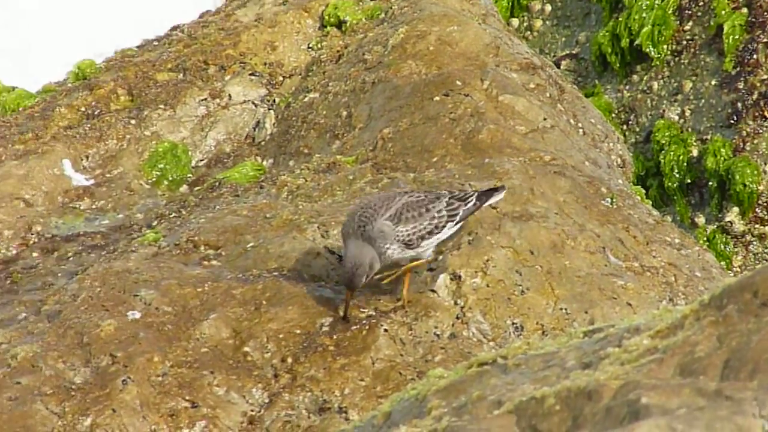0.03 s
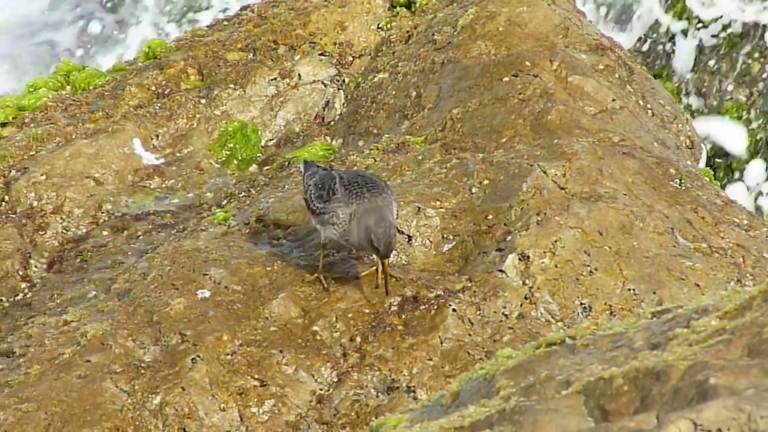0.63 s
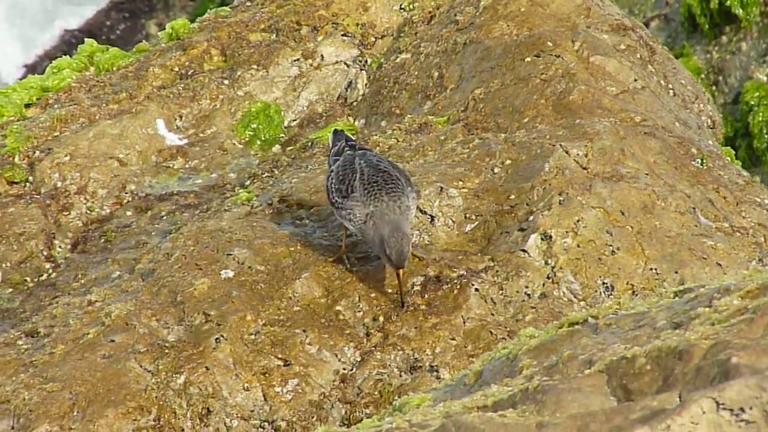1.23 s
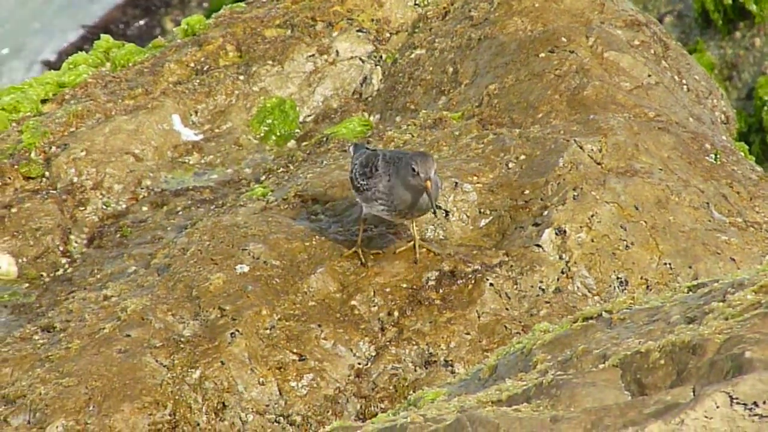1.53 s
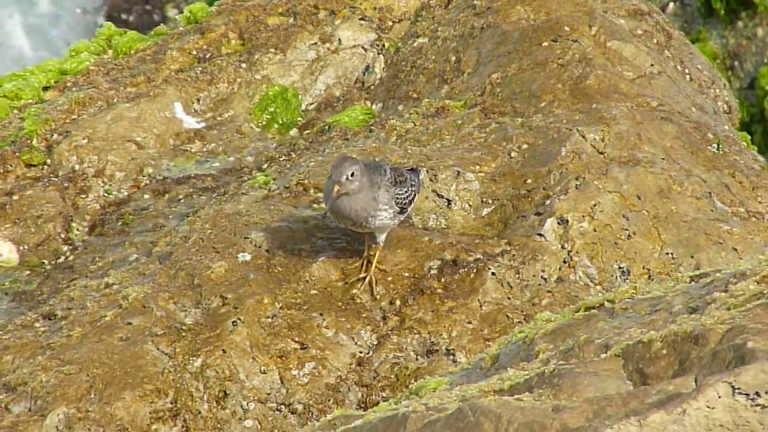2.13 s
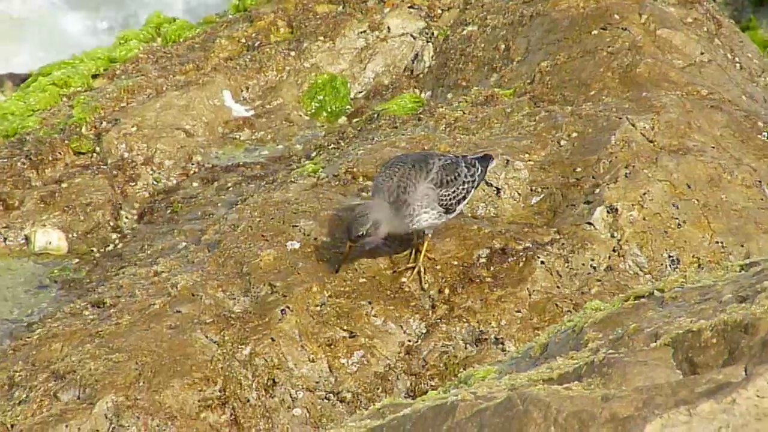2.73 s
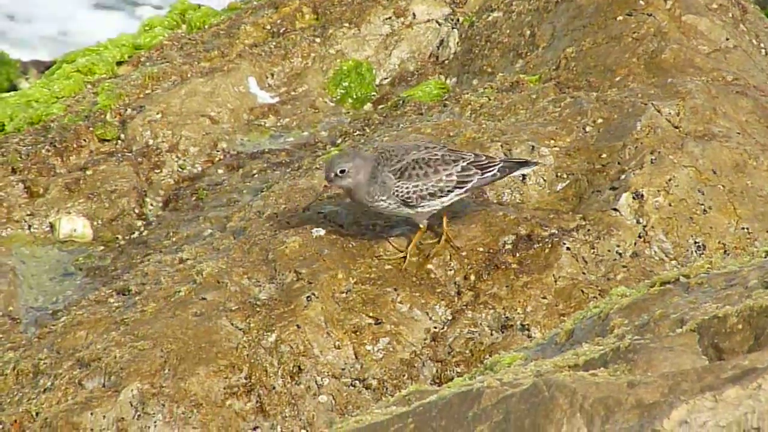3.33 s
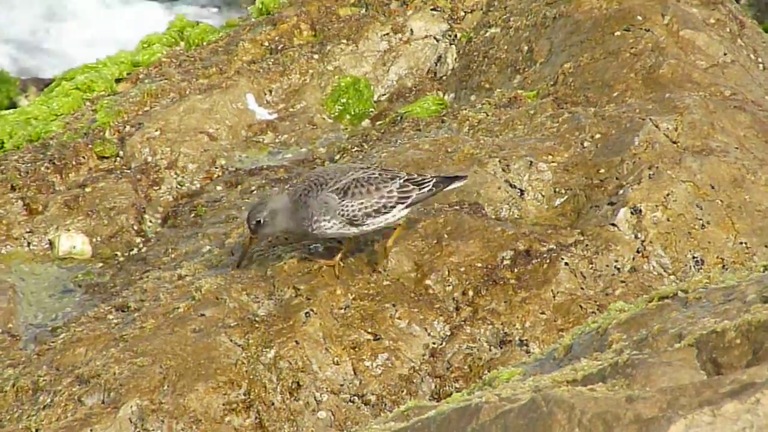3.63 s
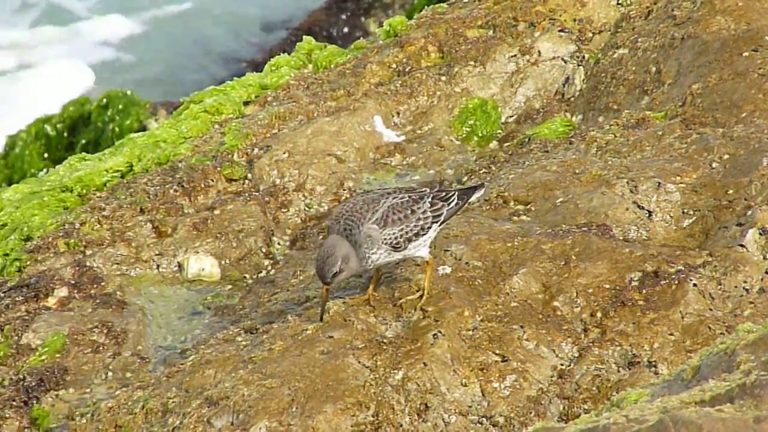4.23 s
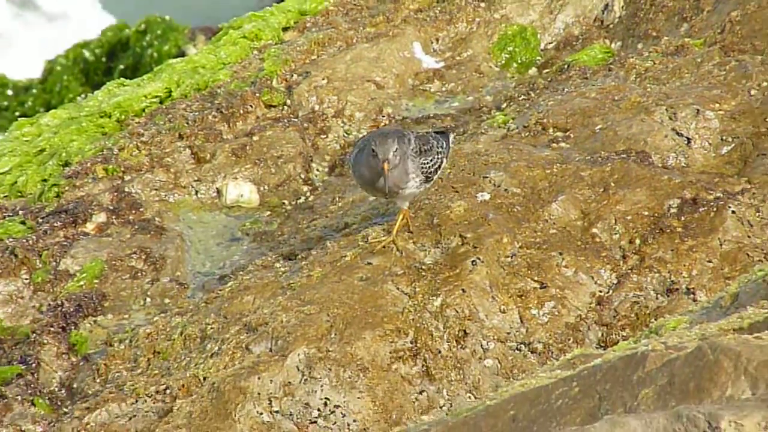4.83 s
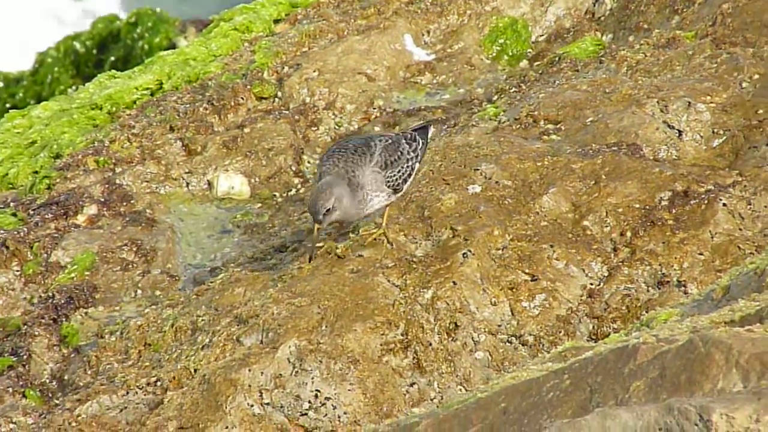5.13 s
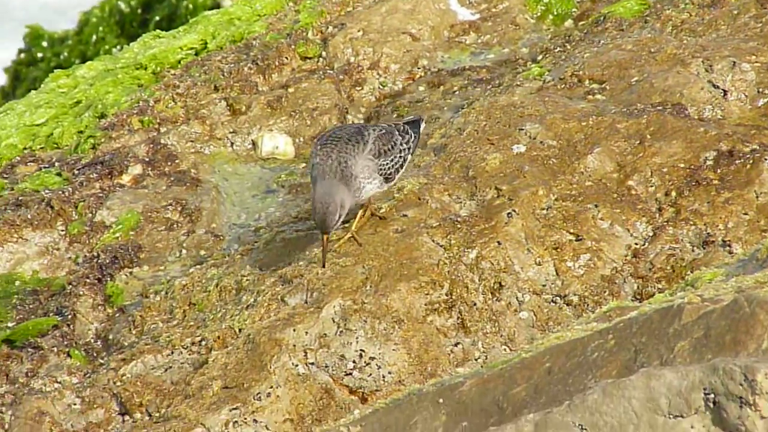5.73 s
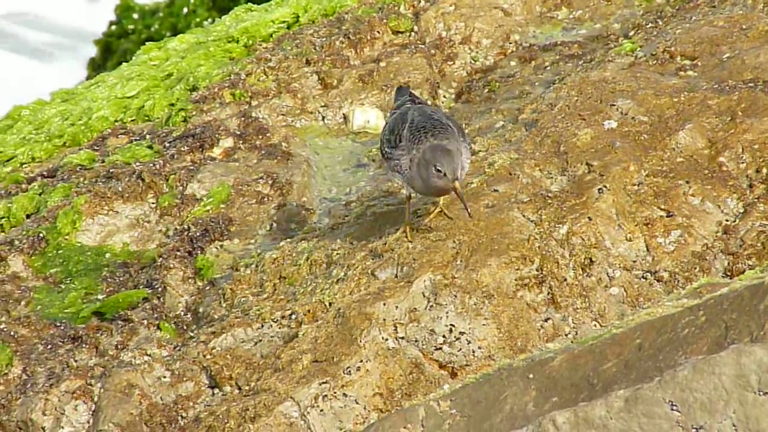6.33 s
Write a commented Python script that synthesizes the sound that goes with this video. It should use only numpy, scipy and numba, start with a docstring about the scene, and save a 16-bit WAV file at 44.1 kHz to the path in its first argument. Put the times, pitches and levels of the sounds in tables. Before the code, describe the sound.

Surf roars and churns steadily in a rocky inlet a few metres below the microphone, with soft hollow booms and a fine fizz of foam. White water washes over the rocks at first and thins after about two seconds. A breeze rises and buffets the microphone with low rumbles and thumps, heavier on the left, then eases in the last couple of seconds while the sea carries on.

```python
"""Surf roars and churns in a rocky inlet, a few metres below a camera with two microphone ports.
Trapped air throbs, swells boom in hollows, and tiny bursting bubbles make foam fizz all round.
A sheet of white water runs over the rocks and thins out after two seconds.
A breeze rises and its eddies buffet the ports, the left one most.
The camera whines faintly, limits the peaks and notches the treble."""
import sys
import numpy as np
from scipy import signal
from scipy.fft import rfft, irfft, next_fast_len
from scipy.io import wavfile
from scipy.ndimage import uniform_filter1d
from numba import njit

SR = 44100
rng = np.random.default_rng(int(sys.argv[2]) if len(sys.argv) > 2 else 0)


def transcribe(signal):
    """Save signal, clipped to [-1, 1], as a 16-bit WAV file at the path in sys.argv[1]."""
    frames = np.atleast_2d(signal).T
    limited = np.clip(frames, -1, 1)
    pcm = np.round(limited * 32767).astype(np.int16)
    wavfile.write(sys.argv[1], SR, pcm)


N = 290178

# the breeze between gusts: time_s, level_db
BREEZE = [(0, -53), (.7, -37), (1.3, -33), (1.7, -24), (2.0, -26.5), (2.6, -23.5), (3.1, -28.5), (3.6, -22),
          (4.42, -40), (4.7, -29.5), (5.4, -32.5), (6.15, -28.5), (6.58, -30.5)]
# gusts riding on the breeze: crest_s, level_db, build_s
GUSTS = [(.92, -29, 0.038), (1.13, -26.5, 0.11), (1.6, -26, 0.11), (1.72, -19, 0.04), (1.87, -21.5, 0.099),
         (2.18, -21, 0.072), (2.35, -17, 0.066), (2.74, -20.5, 0.091), (2.88, -22, 0.063),
         (2.99, -23, 0.047), (3.31, -23, 0.11), (3.58, -19.5, 0.065), (3.72, -24, 0.14),
         (3.91, -23.5, 0.06), (4.14, -22.5, 0.05), (4.34, -22, 0.12), (4.49, -25.5, 0.039),
         (6.22, -27.5, 0.1)]
# single eddies that thump the ports, each with its own loudness and pitch: centre_s, level_db, pitch_hz
BUFFETS = [(1.448, -14, 200), (1.514, -8, 220), (1.589, -15, 150), (1.674, -8, 230), (1.686, -4.5, 220),
           (1.698, -9, 135), (1.74, -11, 150), (1.802, -16, 121), (1.816, -14, 95), (2.127, -12, 213),
           (2.148, -14, 150), (2.181, -4.5, 140), (2.284, -9, 149), (2.310, -6.5, 117), (2.346, -9, 75),
           (2.368, -3, 125), (2.666, -12.5, 170), (2.686, -5, 150), (2.727, -8, 130), (2.816, -16, 130),
           (2.88, -17, 135), (3.177, -12.5, 150), (3.272, -9, 114), (3.392, -7, 220), (3.511, -11, 119),
           (3.544, -10.5, 110), (3.56, -13, 130), (3.594, -11, 160), (3.628, -6.5, 191), (3.66, -8, 110),
           (3.708, -9, 111), (3.851, -9, 100), (3.896, -11, 130), (4.087, -13, 100), (4.161, -14, 170),
           (4.199, -10, 150), (4.319, -14, 190), (4.348, -15, 150), (6.217, -11, 160)]
# tone of the wind's large and small eddies: frequency_hz, gain_db
RUMBLE_EQ = [(20, -13), (45, -3.5), (72, 3), (120, 3), (190, 0.1), (280, -7.5), (380, -13.5), (550, -20.5),
             (900, -24.5), (2000, -62.5)]
FLUTTER_EQ = [(80, -17), (160, -3.5), (230, 0.5), (320, -5), (450, -8.5), (700, -17.5), (1500, -53.5)]
# how alike the two ports sound: frequency_hz, correlation (clipped at -1 and 1)
WIND_LIKENESS = [(30, 1), (80, 0.82), (130, 0.64), (190, 0.23), (300, 0.13), (1000, -1.2)]
FOAM_LIKENESS = [(700, .3), (1500, 0), (2500, 0.034), (3200, 0.46), (3800, 0.64), (5000, .42), (6000, .3),
                 (6600, -0.19), (8000, -0.37)]

# the surge and ebb of the sea: time_s, roar_db, white_water_db
SURGE = [(0, -26, -30.5), (.6, -27, -31), (1.03, -27, -33.5), (1.5, -26, -31.5), (2.08, -27, -36),
         (2.4, -28, -38), (2.9, -28, -37.5), (3.3, -26, -37), (3.55, -27.5, -39.5), (3.8, -26.5, -39.5),
         (4.2, -27.5, -39), (4.9, -28.5, -39), (6.58, -28.5, -39)]
# spray thrown up by the rocks: centre_s, foam_boost_db
SPLASHES = [(.63, 0.5), (1.36, 1), (2.05, 1.0), (2.9, 1.0), (3.98, 1.0), (6.13, 0.9)]
# water slumping into hollows of the rock: centre_s, level_db, pitch_hz
SLUMPS = [(0.523, -25.5, 377), (0.895, -26.5, 240), (0.985, -24, 323), (1.145, -21.5, 310),
          (1.26, -24.5, 268), (1.46, -24.5, 414), (1.89, -26.5, 295), (1.975, -24.5, 338),
          (2.143, -22, 342), (2.61, -26, 274), (2.69, -20.5, 340), (2.84, -23, 340), (3.17, -21.5, 323),
          (3.275, -20.5, 400), (3.40, -19.5, 253), (3.87, -28, 362), (4.14, -22.5, 247), (4.33, -21.5, 248),
          (4.45, -24, 276), (4.87, -25.5, 310), (5.34, -24, 330), (5.61, -25.5, 310), (5.69, -27, 282),
          (5.86, -25, 345), (6.17, -25, 340)]
# tone of each water layer: frequency_hz, gain_db
FOAM_EQ = [(100, 4), (700, -5), (1200, 4.5), (1800, 5.5), (2400, 4), (3300, 6), (4200, 1.5), (5000, 2),
           (6000, 1), (7200, -1), (8000, -11.5), (8300, -23)]
WHITE_WATER_EQ = [(400, -0.5), (800, -5.5), (1200, 7), (1600, 5), (2000, 3), (2600, -11), (3300, -3),
                  (4500, -15.5), (8000, -28.5)]
CHURN_EQ = [(20, -29), (60, -13), (115, -5), (170, -5.5), (230, -0.5), (320, 1.5), (420, 0), (530, -6.5),
            (700, -21.5), (1200, -65)]
ROAR_EQ = [(300, -16.5), (550, -2.5), (660, -4.5), (780, -2.5), (1020, -0.5), (1250, -5.5), (1550, -12.5),
           (2200, -42), (4000, -63)]

# the camera body colours the sea differently at each port: frequency_hz, left_minus_right_db
PORT_BALANCE = [(1000, 0), (1550, -1), (1950, 2), (2200, -1.5), (3000, 1.5), (4000, 2.5), (4500, 1),
                (5000, 1), (5500, -2.5), (7000, -1), (8000, 0)]
# it also shifts the phase between them: frequency_hz, left_lead_rad
PORT_PHASE = [(1000, 0.11), (1700, 0.48), (2300, 0.79), (3200, -0.087), (3800, -1.8), (4900, -0.8),
              (6000, -.8), (7500, -0.15)]
# the camera's treble notches: centre_hz, width_hz
NOTCHES = [(2600, 540), (4608, 950), (5432, 270), (7908, 180), (8096, 170)]

TIME_S = np.arange(N) / SR
FFT_SIZE = next_fast_len(N)
BIN_HZ = np.fft.rfftfreq(FFT_SIZE, 1 / SR)


def undb(db):
    """Decibels to gain."""
    return 10 ** (np.asarray(db) / 20)


def unit(x):
    """Scale to rms 1."""
    return x / np.sqrt(np.mean(x ** 2))


def envelopes(table):
    """One envelope for each level column of a timed table."""
    times, *columns = np.transpose(table)
    return [np.interp(TIME_S, times, column) for column in columns]


def per_bin(points):
    """Join (frequency, value) points on a log-frequency axis, one value per FFT bin."""
    hz, value = np.transpose(points)
    return np.interp(np.log(BIN_HZ + 1), np.log(hz), value)


def colour(x, eq):
    """Shape a sound with an EQ curve; rms 1."""
    return unit(irfft(rfft(x, FFT_SIZE) * undb(per_bin(eq)), FFT_SIZE)[..., :N])


def wobble(rate_hz):
    """Random steps, smoothed twice into a drift; rms 1."""
    hold = max(int(SR / rate_hz), 2)
    steps = np.repeat(rng.standard_normal(N // hold + 2), hold)[rng.integers(hold):]
    return unit(uniform_filter1d(uniform_filter1d(steps, hold), hold)[:N])


def stereo(two, likeness):
    """Mix two unrelated signals into left and right with a given correlation."""
    likeness = np.clip(likeness, -1, 1)
    mid = np.sqrt((1 + likeness) / 2) * two[0]
    side = np.sqrt((1 - likeness) / 2) * two[1]
    return np.array([mid + side, mid - side])


def port_noise(likeness):
    """White noise at the two ports, its stereo width changing with frequency."""
    spectra = rfft(rng.standard_normal((2, FFT_SIZE)))
    return irfft(stereo(spectra, per_bin(likeness)), FFT_SIZE)[:, :N]


@njit
def ring(start, hz, cycles, gain, pan, glide):
    """Bubbles ring as damped sines that rise in pitch as they near the surface."""
    out = np.zeros((2, N))
    for k in range(len(start)):
        length = int(cycles[k] * SR / hz[k]) + 2
        phase, level, fade = 0., gain[k], np.exp(-6. / length)
        for i in range(min(length, N - start[k])):
            phase += 2 * np.pi * hz[k] / SR * (1 + glide * i / length)
            level *= fade
            sample = level * np.sin(phase)
            out[0, start[k] + i] += sample * pan[k, 0]
            out[1, start[k] + i] += sample * pan[k, 1]
    return out


def bubbles(count, low_hz, high_hz, cycles, spread_db, width):
    """A cloud of bubbles of random loudness, pitch and direction; rms 1."""
    when, pitch, life, rarity, place = rng.random((count, 5)).T
    start = (when * N).astype(np.int64)
    hz = low_hz * (high_hz / low_hz) ** pitch
    gain = undb(-spread_db * np.log(np.maximum(rarity, .003)))  # many soft, a few loud
    angle = np.pi / 4 + width * (place - .5) * np.pi
    pan = np.column_stack([np.cos(angle), np.sin(angle)])
    return unit(ring(start, hz, cycles * (.5 + life), gain, pan, glide=1 / 4))


@njit
def follow(x, attack, release):
    """Envelope follower with separate rates for rising and falling."""
    out, level = np.empty(len(x)), 0.
    for i in range(len(x)):
        level += (x[i] - level) * (attack if x[i] > level else release)
        out[i] = level
    return out


def whine(pitch_hz=8003, drift_hz=18, level_db=-72):
    """The camera's electronics give off a thin, unsteady tone in each channel."""
    hz = np.array([pitch_hz + drift_hz * wobble(90) for _ in range(2)])
    return undb(level_db) * np.sin(2 * np.pi * np.cumsum(hz, axis=1) / SR)


def airflow(collapse_s=0.025):
    """Wind strength: gusts add their power to the breeze and collapse faster than they build."""
    breeze_db, = envelopes(BREEZE)
    power = undb(breeze_db) ** 2
    for crest_s, level_db, build_s in GUSTS:
        slope_s = np.where(TIME_S < crest_s, build_s, collapse_s)
        power += undb(level_db) ** 2 * np.exp(-((TIME_S - crest_s) / slope_s) ** 2)
    return np.sqrt(power)


def buffets(half_width_cycles=0.53, right_lag_s=0.001):
    """Each strong eddy slaps the left port, then the right, swinging between push and suction."""
    out = np.zeros((2, N))
    for centre_s, level_db, pitch_hz in BUFFETS:
        near = np.abs(TIME_S - centre_s) * pitch_hz < 2 * np.pi * half_width_cycles
        cycles = (TIME_S[near] - centre_s - np.array([[0], [right_lag_s]])) * pitch_hz
        pressure = np.cos(2 * np.pi * (cycles + rng.random()))
        out[:, near] += undb(level_db) * pressure * np.exp(-(cycles / half_width_cycles) ** 2)
    return out


def wind(strong_flow_db=-19.5, flutter_db=-27, flutter_rise=1.4):
    """Eddies tumble across the ports: rumble, flutter and slaps, all heavier on the left."""
    flow = airflow()
    rumble = colour(port_noise(WIND_LIKENESS), RUMBLE_EQ) * flow * undb(0.5 * wobble(50))
    # a faster flow sheds smaller eddies, so gusts sound brighter than the breeze
    flutter_gain = undb(flutter_db) * (flow / undb(strong_flow_db)) ** flutter_rise
    flutter = colour(port_noise(WIND_LIKENESS), FLUTTER_EQ) * flutter_gain
    return (rumble + flutter + buffets()) * undb([[1.7], [-2.2]])


def foam(white_water_db, base_db=-36.5, slack_db=-39.5, splash_s=0.06):
    """Tiny bubbles burst all round; white water lifts the fizz and pulls it left, and spray swells it."""
    fizz = bubbles(count=26000, low_hz=1830, high_hz=7850, cycles=3.9, spread_db=2.5, width=0.84)
    hiss = colour(port_noise(FOAM_LIKENESS) + undb(-7.5) * fizz, FOAM_EQ)
    surge_db = white_water_db - slack_db
    spray_db = sum(db * np.exp(-((TIME_S - centre_s) / splash_s) ** 2) for centre_s, db in SPLASHES)
    level_db = base_db + 0.44 * surge_db + spray_db + 0.26 * wobble(24)
    left_minus_right_db = -2 + 0.11 * surge_db
    return hiss * undb(level_db + left_minus_right_db * np.array([[.5], [-.5]]))


def white_water(level_db):
    """A thin sheet of water tumbles over rock, full of small bubbles, slightly to the right."""
    spray = stereo(rng.standard_normal((2, N)), likeness=0.78)
    froth = bubbles(count=14000, low_hz=683, high_hz=3730, cycles=7.1, spread_db=1.5, width=0.28)
    wash = colour(spray + undb(-5.5) * froth, WHITE_WATER_EQ)
    return wash * undb(level_db + 0.32 * wobble(16)) * undb([[-.8], [.8]])


def slumps(swell_s=0.046):
    """Swells drop into hollows of the rock, each booming briefly at its own pitch."""
    water = rng.standard_normal(N)
    out = np.zeros(N)
    for centre_s, level_db, pitch_hz in SLUMPS:
        boom = signal.lfilter(*signal.iirpeak(pitch_hz, Q=2.2, fs=SR), water)
        boom = signal.lfilter(*signal.iirpeak(pitch_hz, Q=1.2, fs=SR), boom)
        out += unit(boom) * undb(level_db) * np.exp(-((TIME_S - centre_s) / swell_s) ** 2)
    return out


def churn(roar_db, base_db=-24.5, calm_roar_db=-29.5):
    """Big pockets of trapped air throb under the breaking water, swelling with the roar."""
    pockets = bubbles(count=3000, low_hz=143.7, high_hz=612, cycles=8.1, spread_db=2.0, width=.04)
    body = unit(stereo(rng.standard_normal((2, N)), likeness=1.0))
    throb = colour(body + undb(-17.0) * pockets, CHURN_EQ)
    return throb * undb(base_db + 0.51 * (roar_db - calm_roar_db) + 0.18 * wobble(9.5))


def roar(level_db):
    """The broad rush of the surf, almost straight ahead."""
    rush = colour(stereo(rng.standard_normal((2, N)), likeness=0.99), ROAR_EQ)
    return rush * undb(level_db + 0.16 * wobble(8.6)) * undb([[-.3], [.6]])


def camera_body(sound):
    """Sound bends round the camera, reaching each port with its own colour and phase."""
    split = np.array([[.5], [-.5]])
    response = undb(split * per_bin(PORT_BALANCE)) * np.exp(1j * split * per_bin(PORT_PHASE))
    return irfft(rfft(sound, FFT_SIZE) * response, FFT_SIZE)[:, :N]


def scene():
    """The sea below, and the breeze right on the ports."""
    roar_db, white_water_db = envelopes(SURGE)
    sea = churn(roar_db) + slumps() + roar(roar_db) + white_water(white_water_db) + foam(white_water_db)
    return camera_body(sea) + wind()


def record(dry, threshold_db=-6.0, attack_s=0.00041, release_s=0.13, low_cut_hz=22, high_cut_hz=8550):
    """The camera cuts deep bass, ducks on hard buffets, notches the treble, whines and cuts the top."""
    sound = signal.sosfilt(signal.butter(2, low_cut_hz, "high", fs=SR, output="sos"), dry)
    peak = follow(np.abs(sound).max(axis=0), 1 / (attack_s * SR), 1 / (release_s * SR))
    limiter_gain = np.minimum(1, undb(threshold_db) / (peak + 1e-9))
    sound = sound * uniform_filter1d(limiter_gain, size=64)
    for centre_hz, width_hz in NOTCHES:
        sound = signal.lfilter(*signal.iirnotch(centre_hz, centre_hz / width_hz, fs=SR), sound)
    high_cut = signal.ellip(10, .2, 80, high_cut_hz, fs=SR, output="sos")
    return signal.sosfilt(high_cut, sound + whine())


dry = scene()
out = record(dry)
transcribe(out)
```